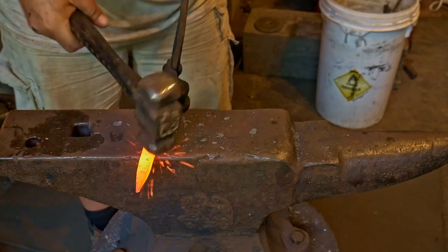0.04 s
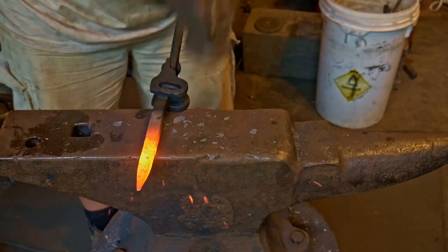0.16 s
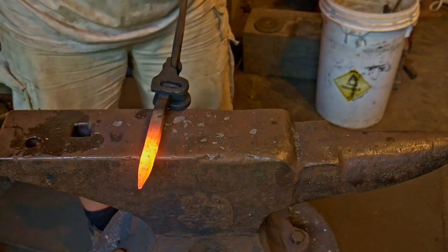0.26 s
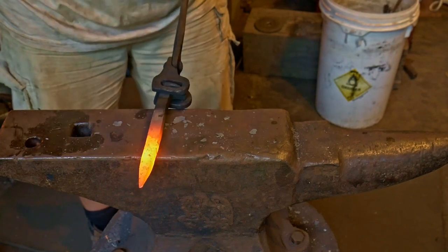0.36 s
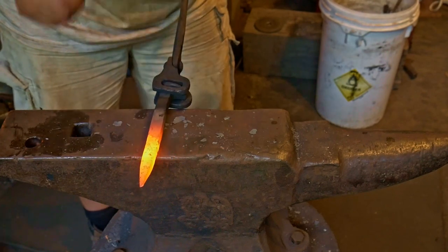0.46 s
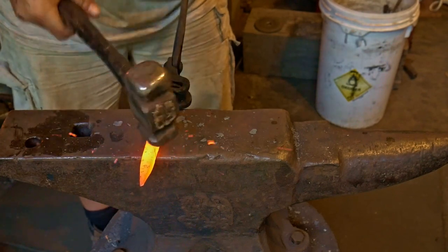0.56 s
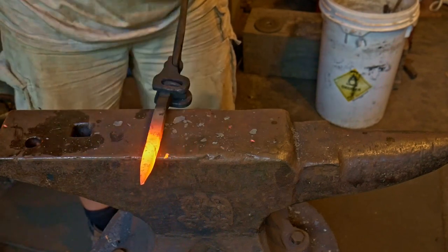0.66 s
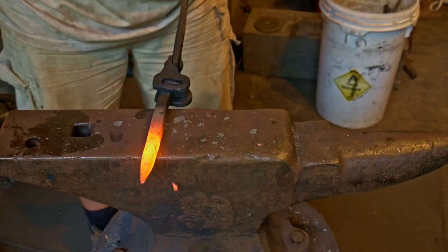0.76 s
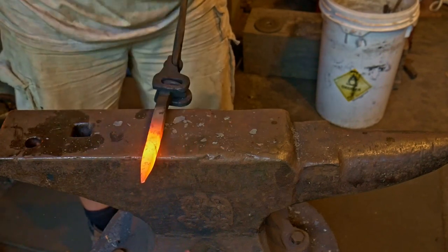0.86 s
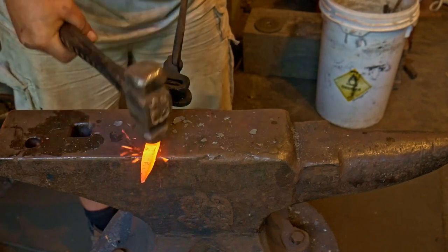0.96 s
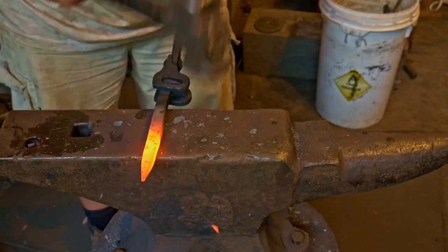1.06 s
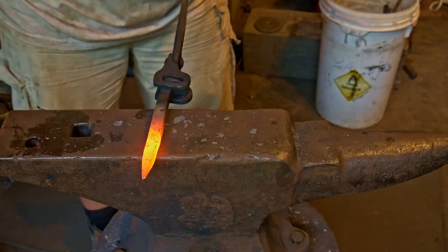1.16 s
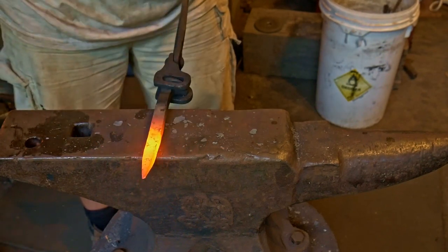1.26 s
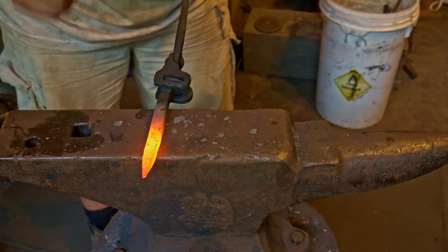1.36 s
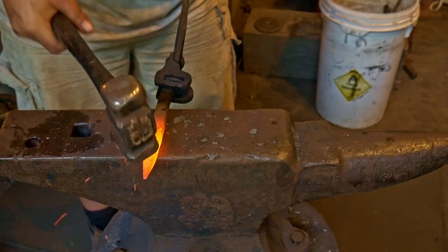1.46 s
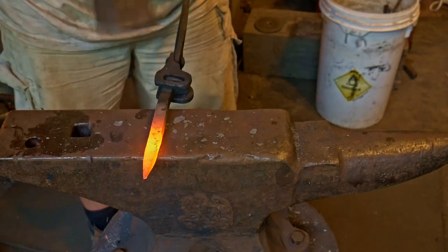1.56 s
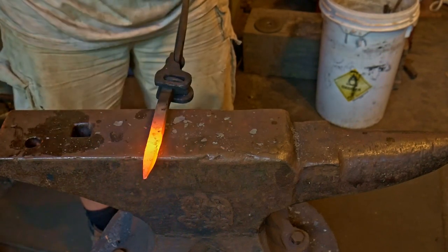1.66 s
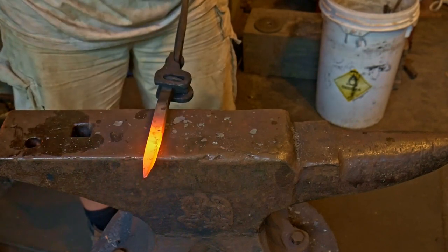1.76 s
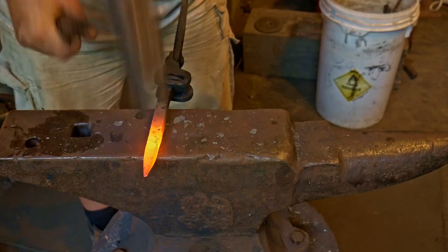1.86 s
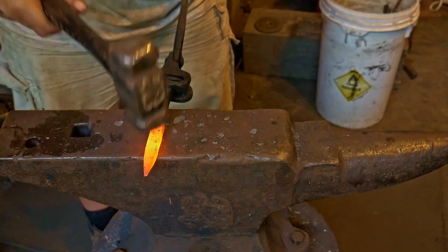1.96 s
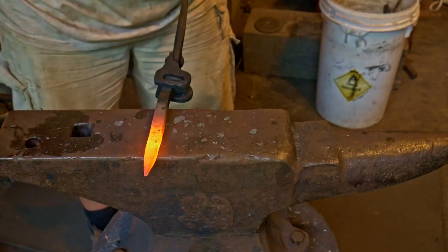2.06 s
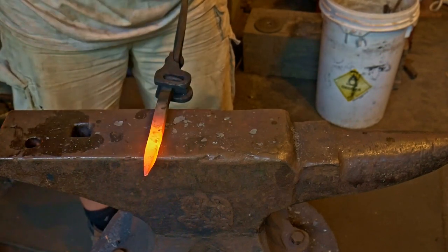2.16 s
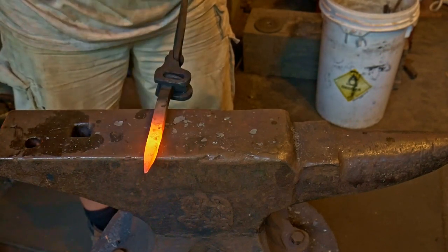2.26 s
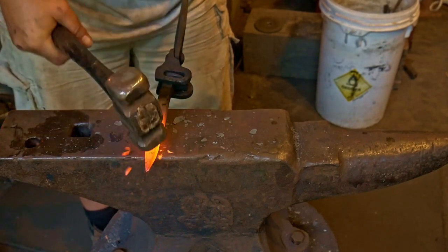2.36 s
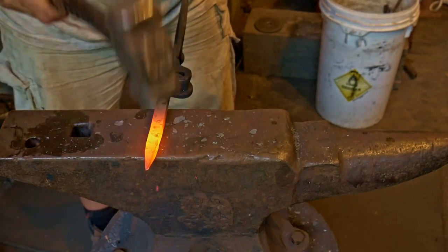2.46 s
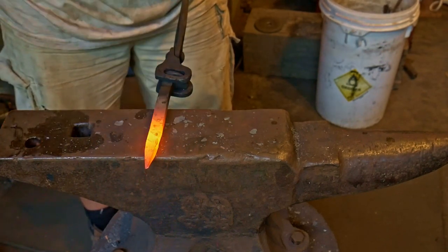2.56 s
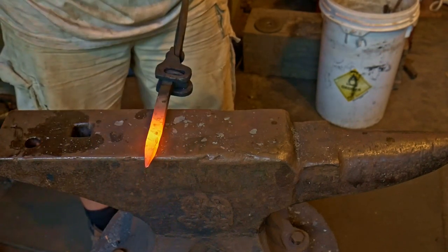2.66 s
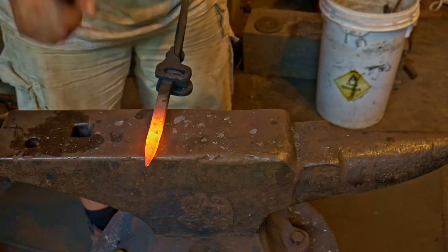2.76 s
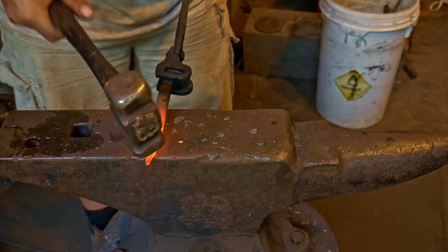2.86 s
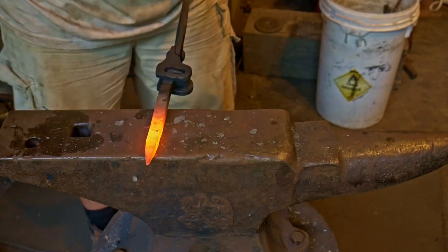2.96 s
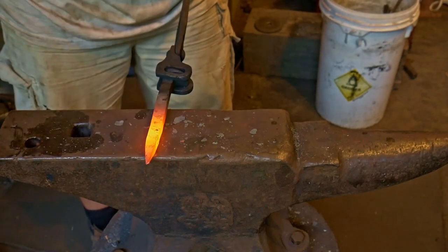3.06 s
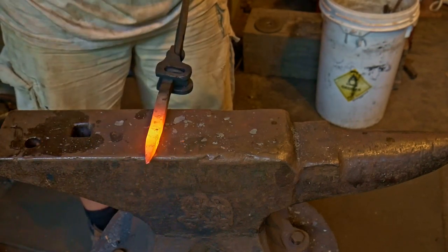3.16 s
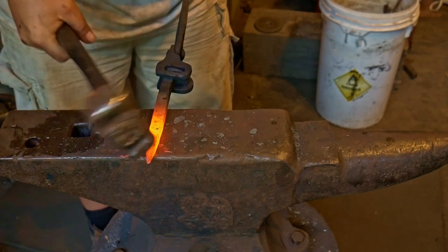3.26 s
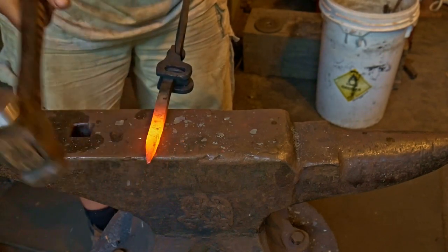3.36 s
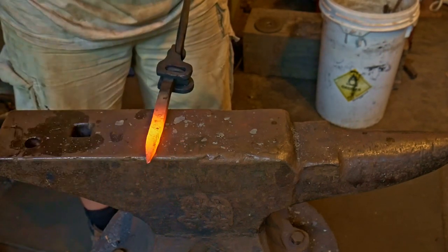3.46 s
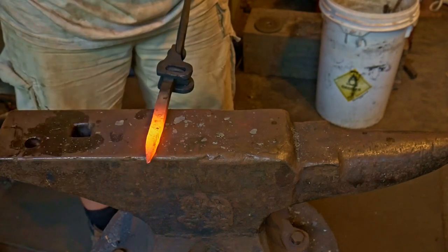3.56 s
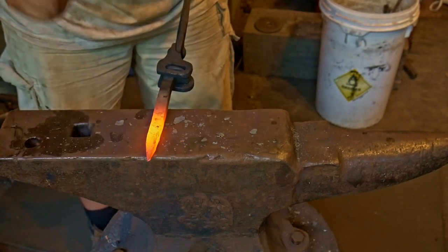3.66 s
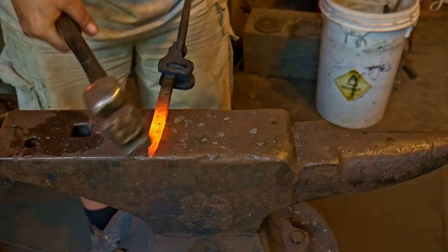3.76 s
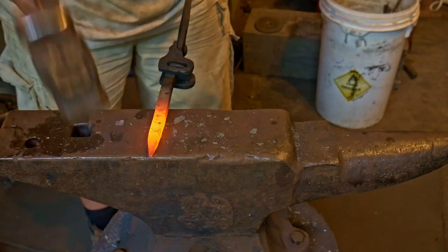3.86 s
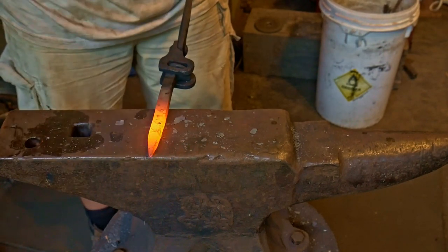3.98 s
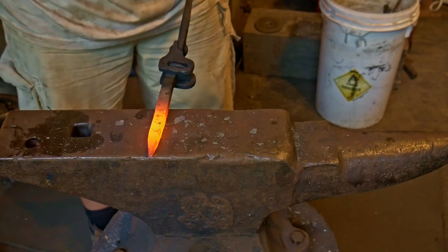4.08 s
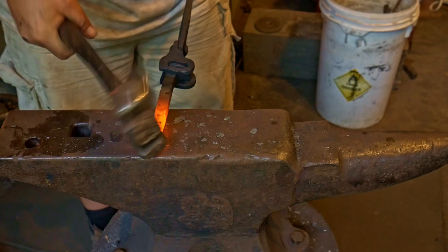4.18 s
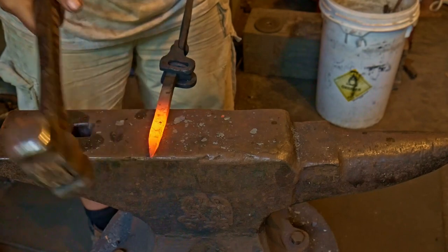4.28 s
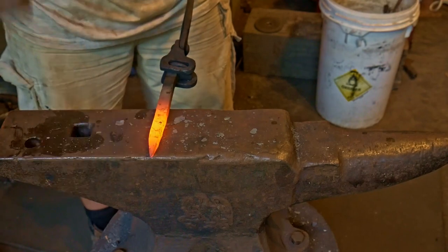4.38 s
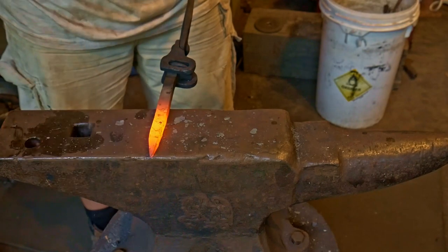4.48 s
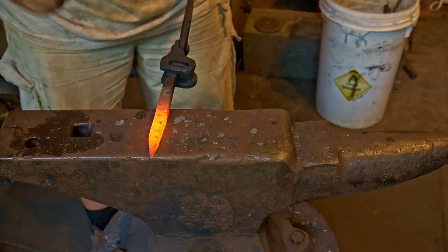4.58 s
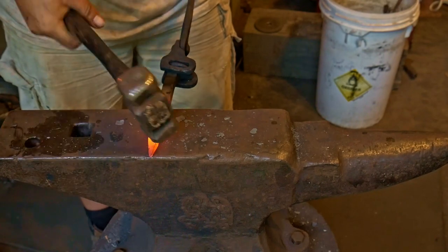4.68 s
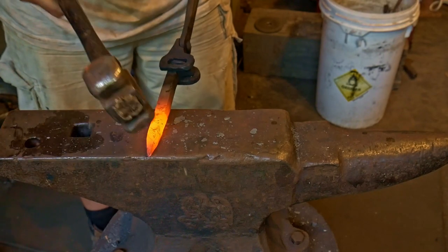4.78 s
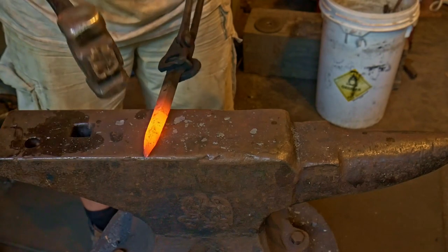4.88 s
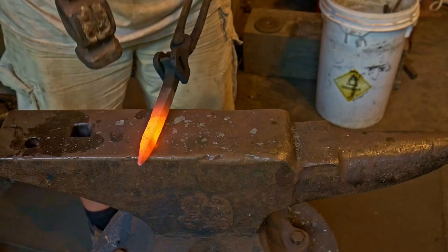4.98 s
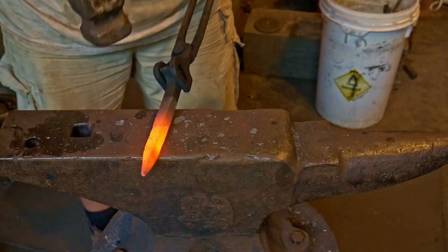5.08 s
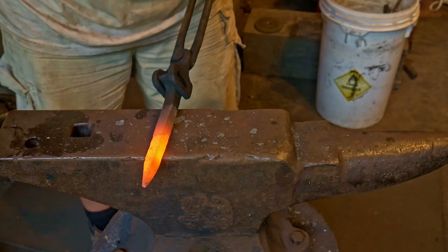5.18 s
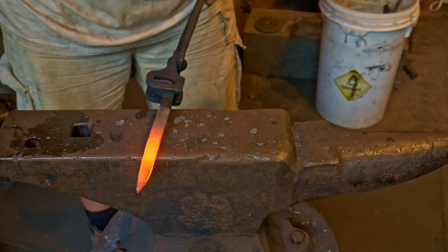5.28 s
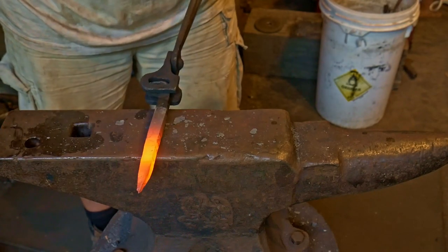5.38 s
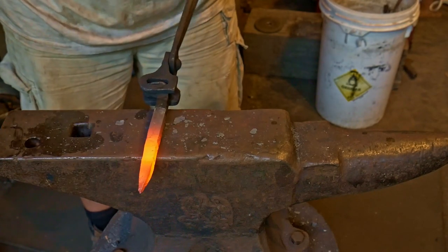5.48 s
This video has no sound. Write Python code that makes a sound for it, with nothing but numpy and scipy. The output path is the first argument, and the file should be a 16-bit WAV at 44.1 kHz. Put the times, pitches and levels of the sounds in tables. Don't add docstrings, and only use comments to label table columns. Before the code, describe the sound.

Regular blacksmith hammering heard at arm's length on a phone. Loud, dry clanks come about twice a second, with the anvil's damped ring smearing into a short room tail under half a second. The tone shifts a little from blow to blow, later ones duller and less gritty. Between them the low burner roar is pushed down by noise suppression, swelling just before each hit and closing again, bass first.

```python
import sys
import numpy as np
from scipy import signal
from scipy.fft import rfft, irfft, next_fast_len
from scipy.io import wavfile
from scipy.ndimage import uniform_filter1d

SR = 44100
rng = np.random.default_rng(int(sys.argv[2]) if len(sys.argv) > 2 else 0)


def gain_from_db(level_db):
    decades = np.asarray(level_db, float) / 20
    return 10 ** decades


def dump(signal):
    limited = np.clip(np.atleast_2d(signal).T, -1, 1)
    pcm = np.round(limited * 32767).astype(np.int16)
    wavfile.write(sys.argv[1], SR, pcm)


N = 243873

# f/Hz, level/dB
ROAR_COLOUR = [(18, -80), (30, -36), (85, -15), (115, -5.5), (153, -9.5), (194, -7.5), (259, -12.5),
               (336, -5), (437, -4.5), (486, -11.5), (1010, -11), (1250, -16), (2060, -19), (2480, -21.5),
               (9970, -37.5), (16000, -46)]
# f/Hz, level/dB
ROAR_TOP = [(9500, 1.5), (13000, -6.5), (16000, -2.5)]
# f/Hz, side minus mid/dB
ROAR_SIDE = [(60, -1.5), (110, -8), (200, -11), (380, -12.5), (700, -8), (1290, -9.5), (2380, -8.5),
             (4400, -10.5), (8120, -8.5), (15000, -4)]
# t/s, level/dB
ROAR_LEVEL = [(0.0, -47), (0.3, -50.5), (1.0, -48.5), (5.05, -51.5), (5.53, -48.5)]
# f/Hz, level/dB
TAIL_COLOUR = [(260, -38.5), (450, -30), (555, -28.5), (882, -6), (1320, 0), (1580, -8.5), (2870, -4.5),
               (3380, -9.5), (9340, -14), (14200, -29.5), (16000, -52.5)]
# f/Hz, t60/s
TAIL_T60 = [(500, 0.46), (1200, 0.35), (2500, 0.44), (5000, 0.42), (9000, 0.44), (14000, 0.38)]
# t/s, share of the thump, level of the crack/dB
WALL_ECHOES = [
    (.0106, -.36, -21),
    (.0196, .33, -25),
    (.032, .12, -30),
    (.0478, .14, -33),
    (.0545, .3, -33),
    (.1125, .09, -45),
]
# f/Hz, level/dB, t60/s
STAND_MODES = [(190, -38, .15), (260, -34, .2), (310, -29, .6), (330, -37, .5), (357, -30, .5),
               (404, -36, .3)]
# f/Hz, level/dB, t60/s
ANVIL_MODES = [(897, -38, 0.53), (911, -27.5, 0.41), (1124, -29.5, 0.5), (1156, -30, 0.91),
               (1287, -22, 0.53), (1450, -64, 0.32), (1808, -30.5, 0.44), (2334, -26, 0.44),
               (2640, -33, .3), (2675, -33, .5), (2695, -32.5, 0.79), (2754, -30.5, .6),
               (2820, -30.5, 0.56), (3040, -31, 0.32), (3170, -30.5, 0.16), (3523, -29, 0.32),
               (3803, -33, 0.54), (3810, -24.5, 0.43), (3854, -38.5, .5), (4300, -36, 0.44),
               (4500, -30, 0.68), (4596, -31.5, .5), (4540, -33, 0.37), (4740, -36.5, 0.55),
               (5100, -35.5, 0.3), (6400, -38, 0.42), (6610, -35, 0.57), (7500, -36.5, 0.34),
               (9350, -35.5, .4), (10990, -37.5, 0.415)]
# f/Hz, mid-face level/dB, gain towards the edge/dB, along the face/dB, with tilt/dB
FAMILIES = [(1300, -.5, -0.5, 1.2, 1.5), (2345, 0, -3.5, 2, 2), (2780, -3, 21.5, 0.3, -0.3),
            (3850, 0.1, -2.5, -6.5, 0.5), (4600, -1, 4, 0.6, -4)]
# f/Hz, level/dB
GRIT_COLOUR = [(1470, -17), (2500, -9), (3460, -6), (6450, -11), (7650, -13), (10300, -8), (11500, -18),
               (13400, -19.5), (16000, -35)]
# f/Hz, level/dB, t60/s, gain towards the edge/dB
CRACK_MODES = [(809.4, 1.5, 0.014, -6), (1407, 11, 0.0061, -2), (1894, 9, 0.0048, 5.5),
               (2408, 3, 0.011, -6.5), (2717, -4, 0.016, 16), (4106, -0.5, 0.0049, -2.5)]
CRACK_SENSE = [1, 1, -1, 1, 1, -1]
# t/s, peak level/dB, place (0 face - 1 edge), along the face (-1..1), hammer tilt (-1..1)
BLOWS = [(0.1119, -0.5, 0.41, -.14, -0.94), (0.5786, -1.5, 0.43, 1.1, -.4), (1.03, -0.5, 0.26, 0.45, -0.16),
         (1.4914, -0.5, 0.38, 0.13, 1), (1.9547, -1, 0.46, -0.64, -.04), (2.4193, -2, 0.0092, -0.33, 0.62),
         (2.8764, -0.5, 0.23, 0.52, 0.41), (3.3344, 0, 0.7, 0.54, .33), (3.8126, 0, 0.96, -0.84, 0.15),
         (4.2602, -1, 0.88, -0.19, 0.28), (4.74, -1.5, 0.83, 0.052, 0.087)]
# f/Hz, depth/dB, stays open after the blow/s, closing time/s
SUPPRESS = [(152, 10.5, 0.14, 0.027), (350, 9, 0.11, 0.021), (900, 9.5, 0.085, 0.032),
            (2160, 10, 0.15, 0.071), (4470, 10, 0.15, 0.09), (8500, 9, 0.17, 0.075),
            (12900, 9.5, 0.12, 0.1)]
BANDS_HZ = 40 * 2 ** np.arange(0, 8.8, .5)

TAIL_DB, TAIL_FRESH, TAIL_SIDE_DB = -21, 0.9, -6
STREAK_DB, STREAK_WIDTH_HZ = 4, 120
STAND_DB, STAND_LAG_S = -9.5, .00105
ANVIL_DB, ANVIL_SPREAD_HZ = -8.5, 20
CRACK_DB, CRACK_LOW_CUT_HZ = 2.5, 340
EDGE_TREBLE_DB, EDGE_THUMP_DB = -6, -7.5
SCALE_LOSS_DB_PER_S, SCALE_MID_S = -1.4, 2.31
BLOW_PAN_DB = 1.8
NOTCH_HZ, NOTCH_WIDTH_HZ, CEILING, TOP_HZ = 7930, 240, 1.2, 15600
DUCK_DB, DUCK_RECOVER_S = 6.5, 0.069
FRAME_S, FRAME_START_S, LOOKAHEAD_S = .0225, .011, .0217


def read(table, hz, column=1):
    table = np.array(table, float)
    return np.interp(np.log(hz), np.log(table[:, 0]), table[:, column])


def bin_hz(size):
    return np.arange(size // 2 + 1) * SR / size + 1


def split(x):
    size = next_fast_len(x.shape[-1])
    index = np.arange(len(BANDS_HZ))
    place = np.interp(np.log(bin_hz(size)), np.log(BANDS_HZ), index)
    spectrum = rfft(x, size)
    return [irfft(spectrum * np.clip(1 - abs(place - k), 0, 1), size)[..., :x.shape[-1]] for k in index]


def colour(x, table):
    size = next_fast_len(x.shape[-1])
    return irfft(rfft(x, size) * gain_from_db(read(table, bin_hz(size))), size)[..., :x.shape[-1]]


def unit(x):
    return x / np.sqrt(np.mean(x ** 2))


def ring(t, hz, db, t60, sense=1):
    t = np.maximum(t, 0)
    decay = np.exp(-np.log(1000) * np.outer(1 / t60, t))
    return (sense * gain_from_db(db)) @ (np.sin(2 * np.pi * np.outer(hz, t)) * decay)


def delayed(t, x, lag):
    return np.interp(t - lag, t, x, left=0)


def walk(rate):
    k = int(SR / rate)
    steps = np.repeat(rng.standard_normal(N // k + 1), k)
    return 1.3 * uniform_filter1d(uniform_filter1d(steps, k), k)[:N]


def roar():
    mid, side = colour(colour(rng.standard_normal((2, N)), ROAR_COLOUR), ROAR_TOP)
    side = colour(side, ROAR_SIDE)
    swell_db = .6 * walk(1.0)
    flame = 0
    for f, band in zip(BANDS_HZ, split(np.array([mid + side, mid - side]) / np.std(mid))):
        flutter_db = 1.7 * min(600 / f, 1) ** 0.37 * walk(9.5)
        flame = flame + band * gain_from_db(swell_db + flutter_db)
    return flame * gain_from_db(np.interp(np.arange(N) / SR, *np.transpose(ROAR_LEVEL)) + 12.0)


def strike_tint(hz, treble_db, family_db, share):
    family = 0
    for (f, *_), db in zip(FAMILIES, family_db):
        family = family + db * np.exp(-(np.log2(hz / f) / .14) ** 2)
    return 0.84 * treble_db * np.clip(np.log2(hz / 3800), 0, 1) + share * family


def shop_tail(t, walls, treble_db, family_db):
    noise = walls + TAIL_FRESH * unit(colour(rng.standard_normal(walls.shape), TAIL_COLOUR))
    streak_hz = np.arange(1500, 16000, STREAK_WIDTH_HZ)
    streak_db = STREAK_DB * (np.minimum(rng.exponential(size=len(streak_hz)), 2.5) - 1.2)
    streak_db = streak_db * np.clip(streak_hz / 1500 - 1, 0, 1)
    noise = colour(noise, np.c_[streak_hz, streak_db])
    tail = 0
    for f, band in zip(BANDS_HZ, split(noise)):
        decay_db = -60 * t / read(TAIL_T60, f)
        tail = tail + band * gain_from_db(strike_tint(f, treble_db, family_db, 1.0) + decay_db)
    mid, side = gain_from_db(TAIL_DB) * (1 - np.exp(-t / 0.00067)) * tail
    return mid, gain_from_db(TAIL_SIDE_DB) * side


def stand_thump(t):
    push = np.exp(-((t - .0066) / .0037) ** 2)
    return gain_from_db(STAND_DB) * np.sin(2 * np.pi * 310 * (t - STAND_LAG_S)) * push


def anvil_ring(t, treble_db, family_db):
    hz, db, t60 = np.transpose(np.repeat(ANVIL_MODES, 3, axis=0))
    detune, luck = rng.standard_normal((len(hz), 2)).T
    heard_hz = hz + ANVIL_SPREAD_HZ * detune * (hz / 3000) ** .5
    heard_db = ANVIL_DB + db + strike_tint(hz, treble_db, family_db, 1.25) + 2.2 * luck
    return ring(t, heard_hz, heard_db, t60)


def contact(t):
    return 1 - np.exp(-(t / 0.00045) ** 2)


def scale_grit(t, treble_db):
    noise = unit(colour(rng.standard_normal((2, len(t))), GRIT_COLOUR))
    burst = np.exp(-(t / 0.002) ** 2) + 0.16 * np.exp(-t / 0.0054)
    mid, side = gain_from_db(treble_db - 2.0) * noise * contact(t) * burst
    return mid, 0.19 * side


def hammer_crack(t, place):
    hz, db, t60, edge_db = np.transpose(CRACK_MODES)
    detune, luck_db = rng.standard_normal((len(hz), 2)).T
    modes = ring(t, hz * (1 + .015 * detune), db + edge_db * place + luck_db, t60, np.array(CRACK_SENSE))
    low_cut = signal.butter(2, CRACK_LOW_CUT_HZ, "high", fs=SR, output="sos")
    return gain_from_db(CRACK_DB) * signal.sosfilt(low_cut, contact(t) * modes)


def blow(t, walls, place, along, tilt, scale_db):
    treble_db = EDGE_TREBLE_DB * place + scale_db
    family_db = np.array(FAMILIES)[:, 1:] @ [1, place, along, tilt]
    grit, grit_side = scale_grit(t, treble_db)
    sharp = hammer_crack(t, place) + grit
    heard = sharp + anvil_ring(t, treble_db, family_db)
    thump = stand_thump(t)
    low = thump + ring(t - .004, *np.transpose(STAND_MODES))
    for s, share, echo_db in WALL_ECHOES:
        low = low + share * delayed(t, thump, s)
        heard = heard + gain_from_db(echo_db) * delayed(t, sharp, s)
    heard = heard + gain_from_db(EDGE_THUMP_DB * place) * low
    mid, side = shop_tail(t, walls, treble_db, family_db)
    side = side + grit_side
    panned = heard * gain_from_db(np.array([[BLOW_PAN_DB], [-BLOW_PAN_DB]]) / 2)
    return panned + mid + np.array([side, -side])


def scene():
    out = roar()
    t = np.arange(int(.45 * SR)) / SR
    walls = unit(colour(rng.standard_normal((2, len(t))), TAIL_COLOUR))
    for s, peak_db, place, along, tilt in BLOWS:
        sound = blow(t, walls, place - .5, along, tilt, SCALE_LOSS_DB_PER_S * (s - SCALE_MID_S))
        i = int(s * SR)
        out[:, i:i + len(t)] += gain_from_db(peak_db) * sound[:, :N - i]
    return out


def overload(x):
    return x / (1 + (x / CEILING) ** 4) ** .25


def duck(x, since):
    after = np.maximum(since - .003, 0)
    dip = (1 - np.exp(-after / 0.038)) * np.exp(-(after / DUCK_RECOVER_S) ** 2)
    return x * gain_from_db(-DUCK_DB * np.sum(dip, axis=0))


def suppress_noise(x, since):
    blow_s = np.array(BLOWS)[:, :1]
    lead = LOOKAHEAD_S + (blow_s - FRAME_START_S - LOOKAHEAD_S) % FRAME_S
    rise = np.clip((since + lead) / 0.0033 + .5, 0, 1)
    out = 0
    for f, band in zip(BANDS_HZ, split(x)):
        depth_db, hold, closing = (read(SUPPRESS, f, column=c) for c in (1, 2, 3))
        is_open = np.max(rise * np.clip(1 - (since - hold) / closing, 0, 1), axis=0)
        wind_cut_db = 12 * max(np.log2(190 / f), 0)
        out = out + band * gain_from_db(depth_db * (is_open - 1.5) - wind_cut_db * is_open)
    return out


def low_pass(x):
    return signal.sosfilt(signal.butter(12, 16820, fs=SR, output="sos"), x)


def record(dry):
    x = signal.lfilter(*signal.iirnotch(NOTCH_HZ, NOTCH_HZ / NOTCH_WIDTH_HZ, SR), dry)
    since = np.arange(N) / SR - np.array(BLOWS)[:, :1]
    x = suppress_noise(duck(overload(x), since), since)
    mix = signal.sosfilt(signal.butter(8, TOP_HZ, fs=SR, output="sos"), x)
    return low_pass(mix)


dry = scene()
out = record(dry)
dump(out)
```